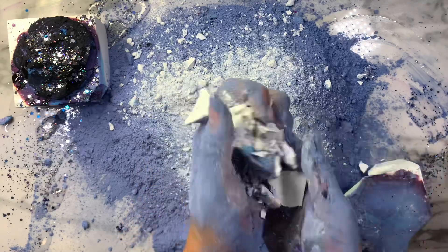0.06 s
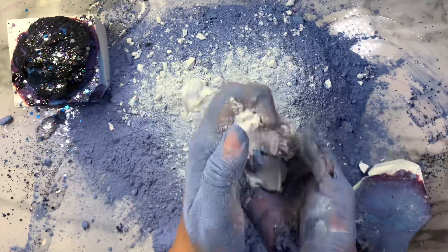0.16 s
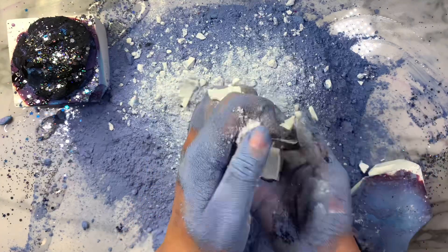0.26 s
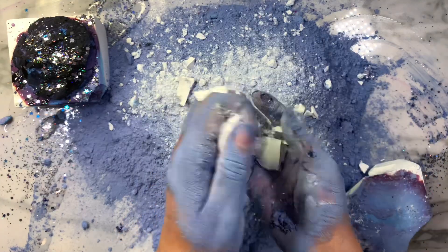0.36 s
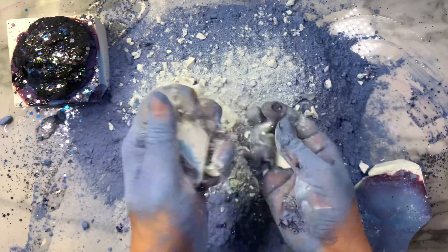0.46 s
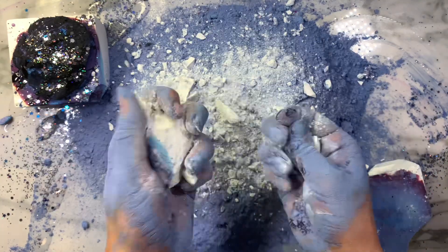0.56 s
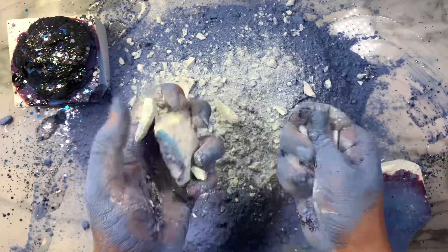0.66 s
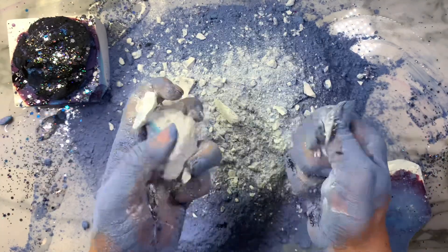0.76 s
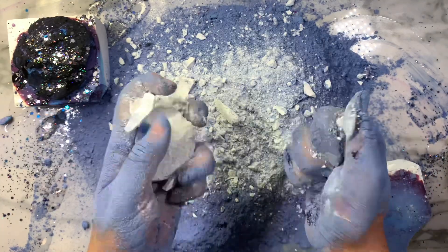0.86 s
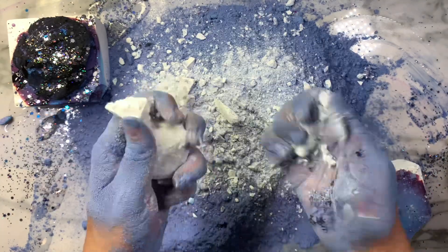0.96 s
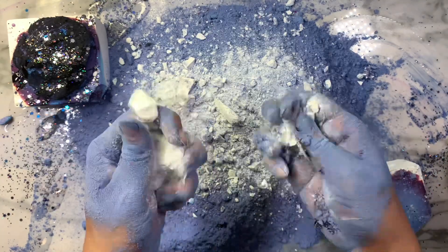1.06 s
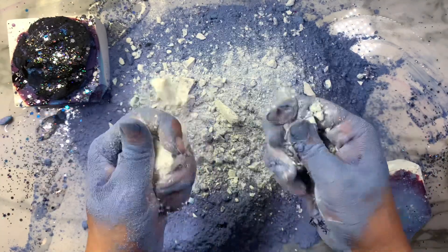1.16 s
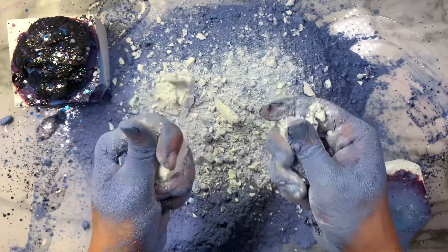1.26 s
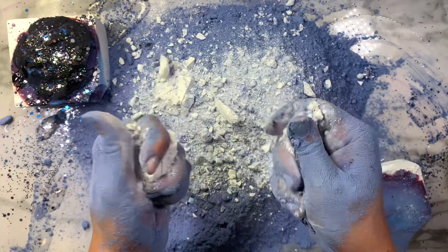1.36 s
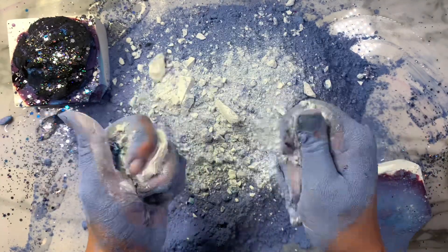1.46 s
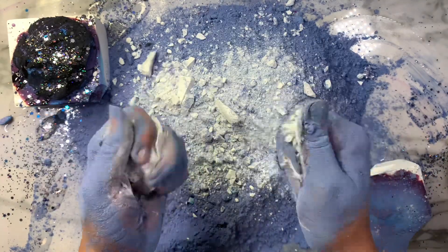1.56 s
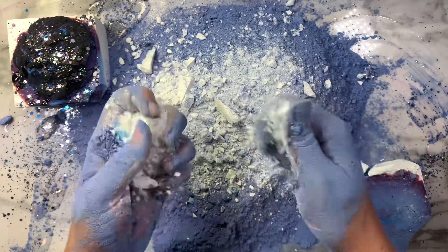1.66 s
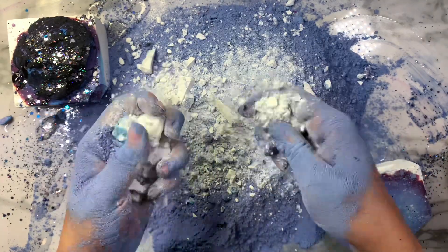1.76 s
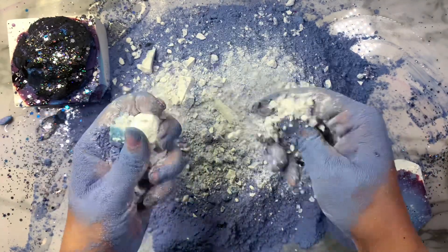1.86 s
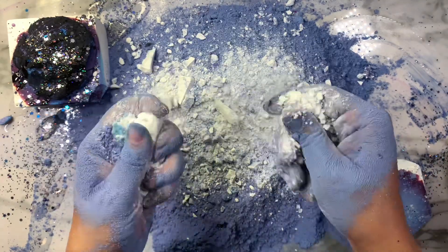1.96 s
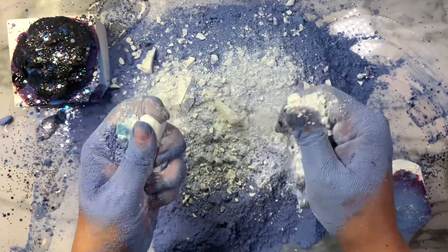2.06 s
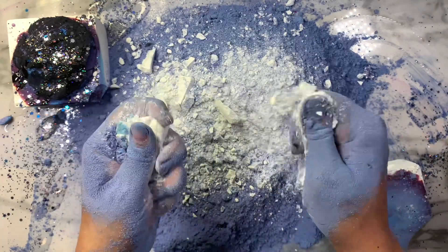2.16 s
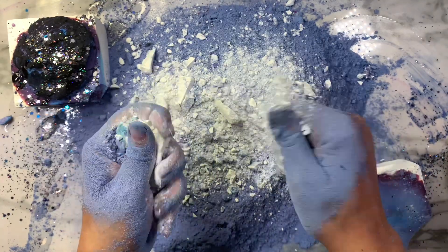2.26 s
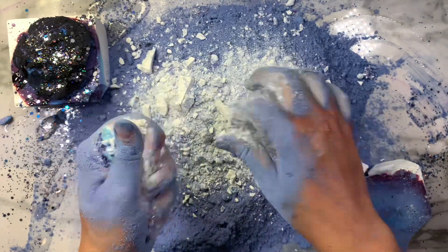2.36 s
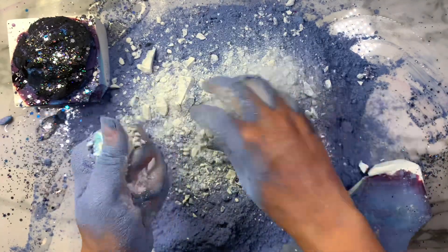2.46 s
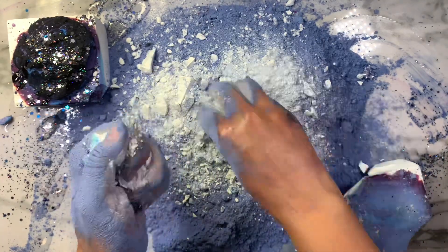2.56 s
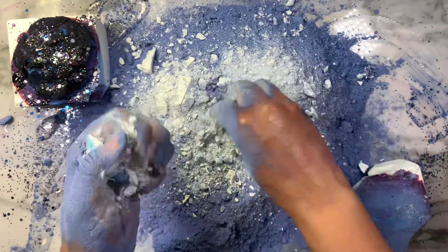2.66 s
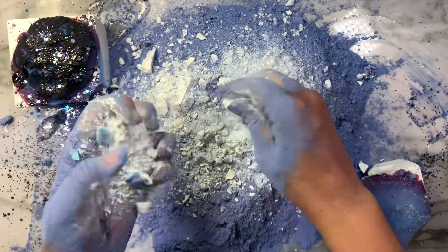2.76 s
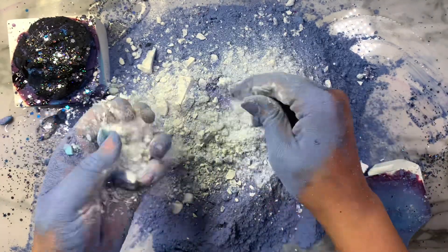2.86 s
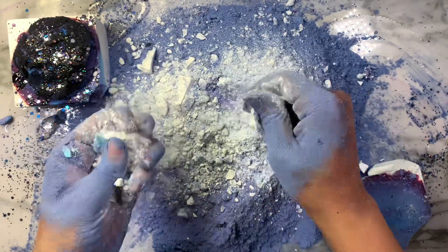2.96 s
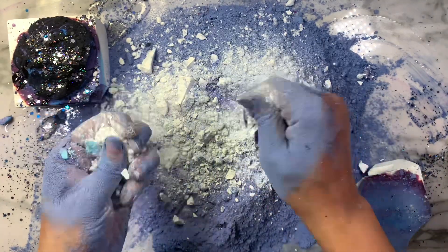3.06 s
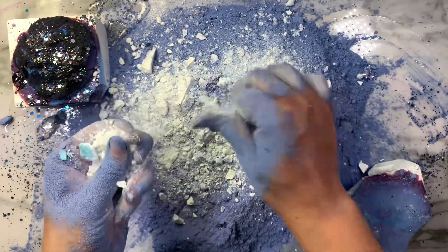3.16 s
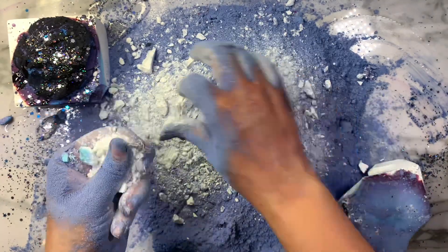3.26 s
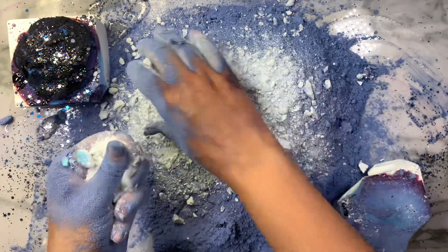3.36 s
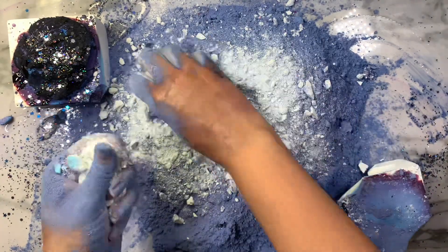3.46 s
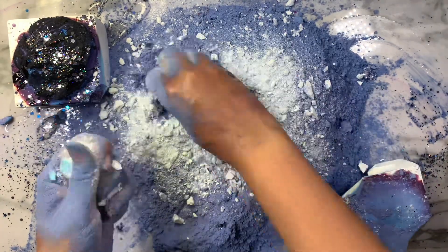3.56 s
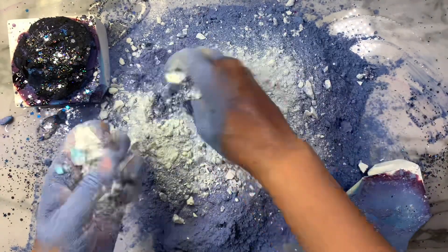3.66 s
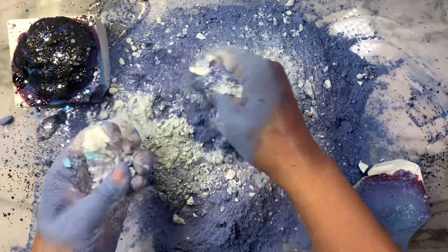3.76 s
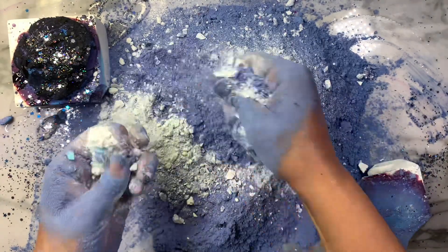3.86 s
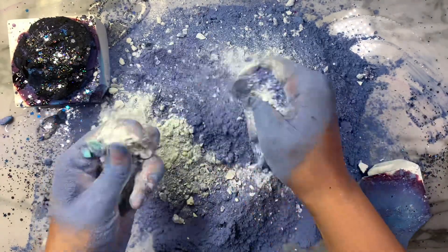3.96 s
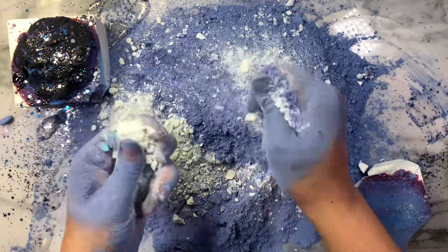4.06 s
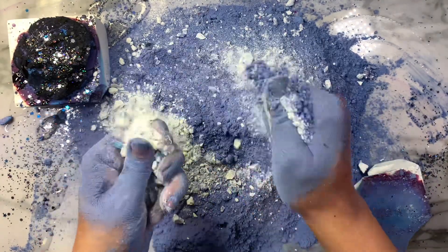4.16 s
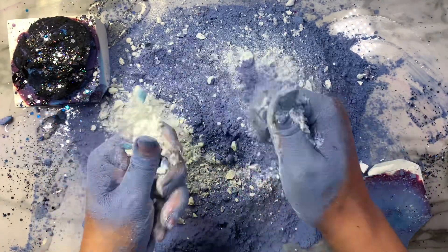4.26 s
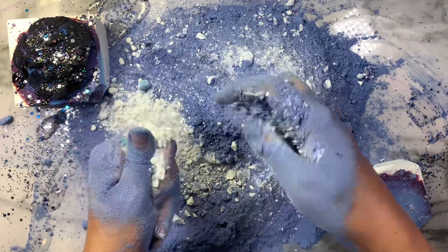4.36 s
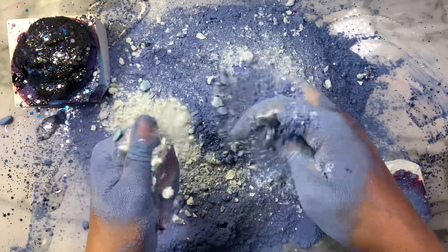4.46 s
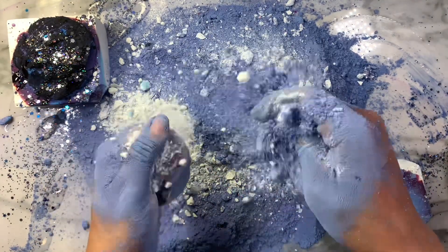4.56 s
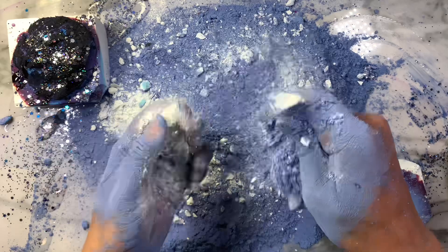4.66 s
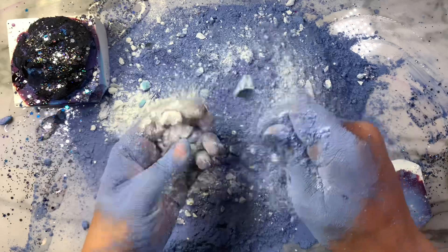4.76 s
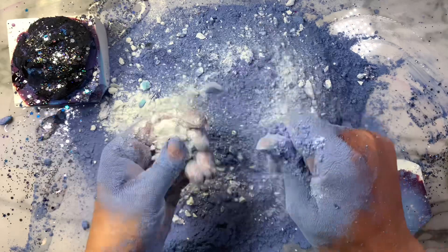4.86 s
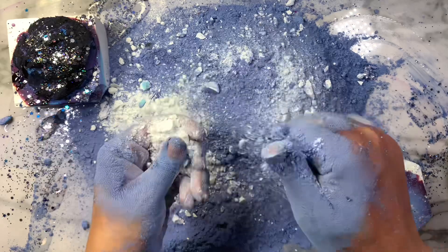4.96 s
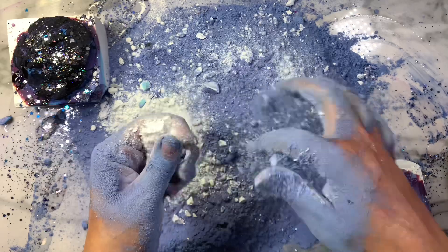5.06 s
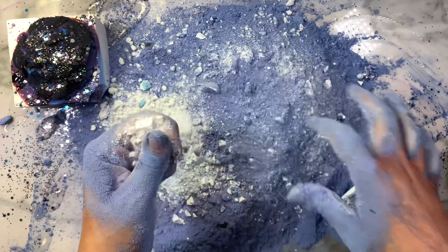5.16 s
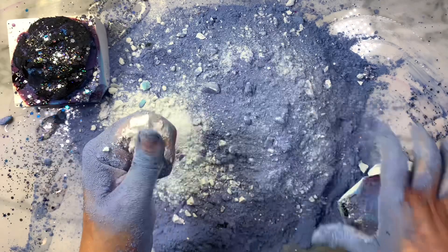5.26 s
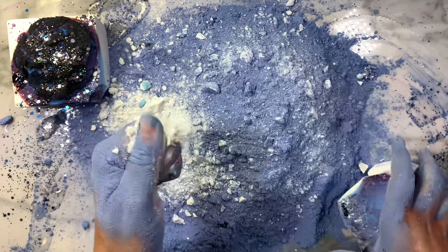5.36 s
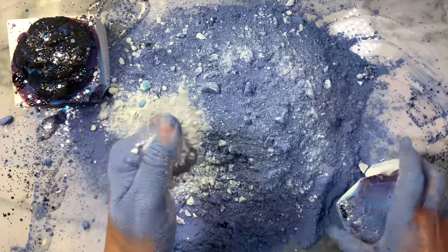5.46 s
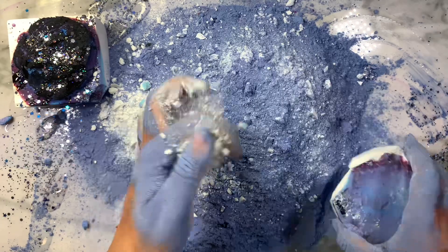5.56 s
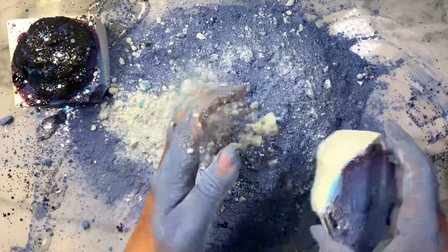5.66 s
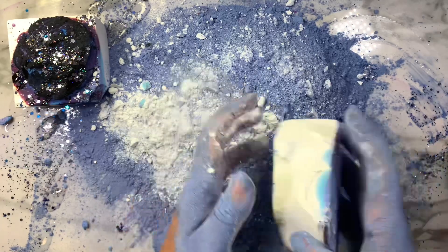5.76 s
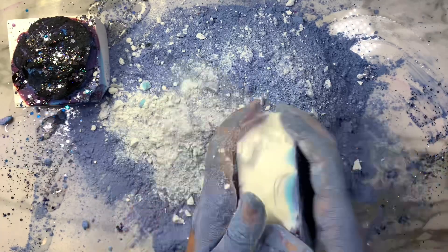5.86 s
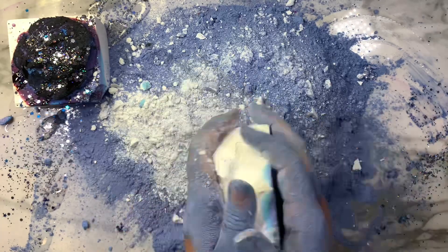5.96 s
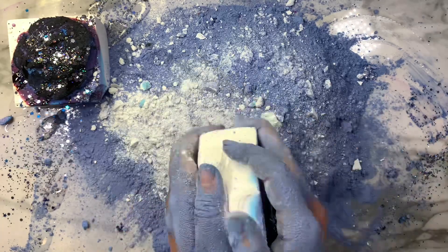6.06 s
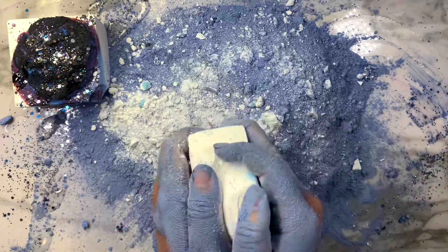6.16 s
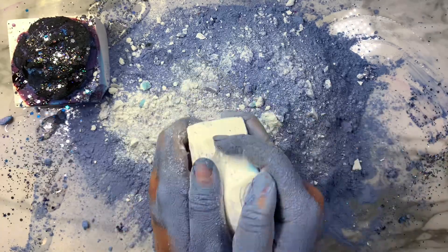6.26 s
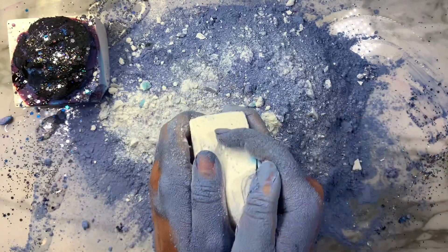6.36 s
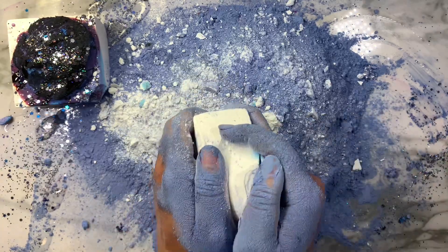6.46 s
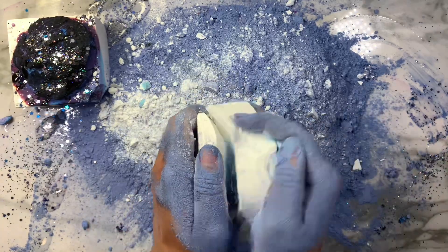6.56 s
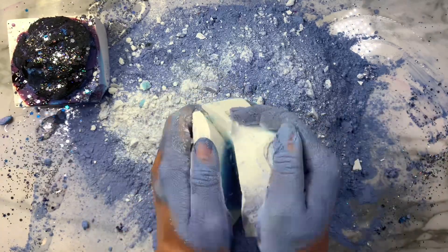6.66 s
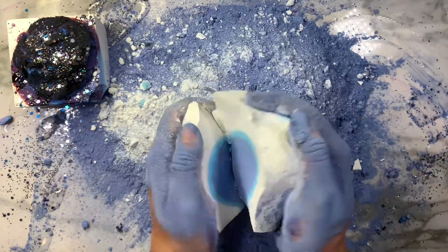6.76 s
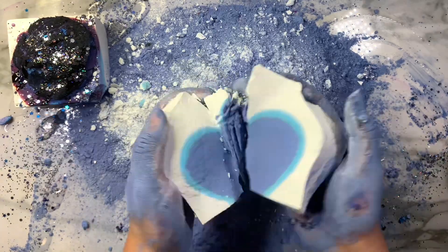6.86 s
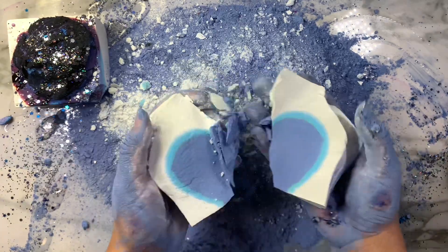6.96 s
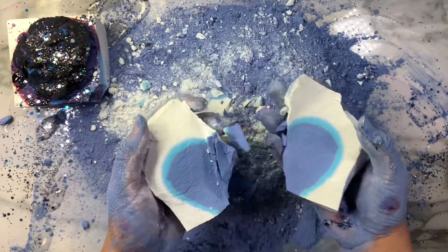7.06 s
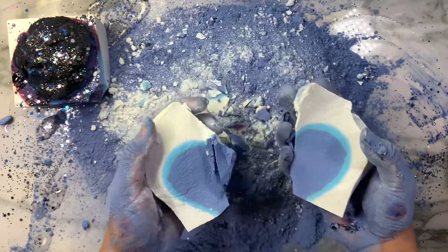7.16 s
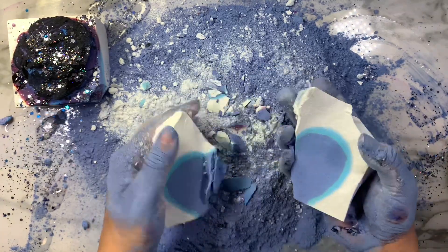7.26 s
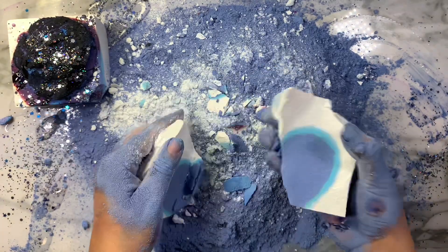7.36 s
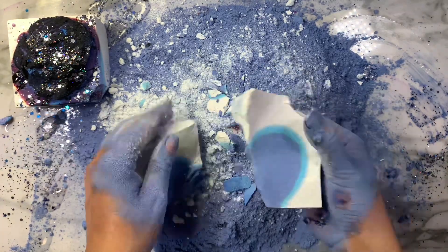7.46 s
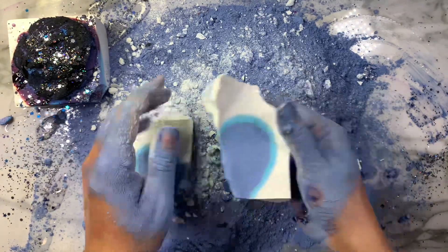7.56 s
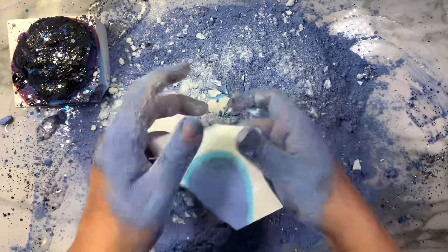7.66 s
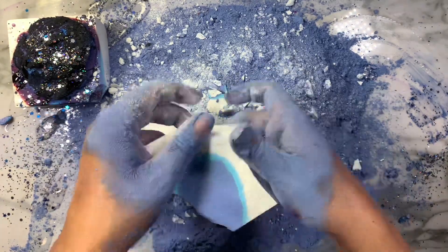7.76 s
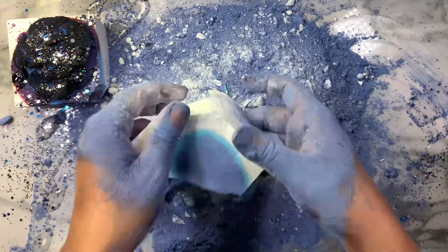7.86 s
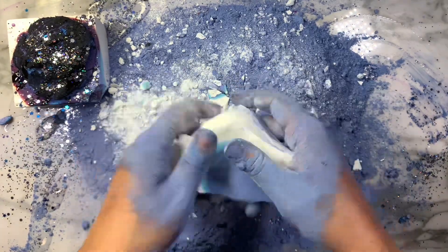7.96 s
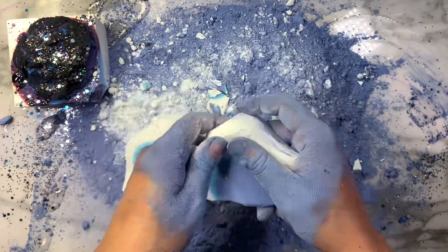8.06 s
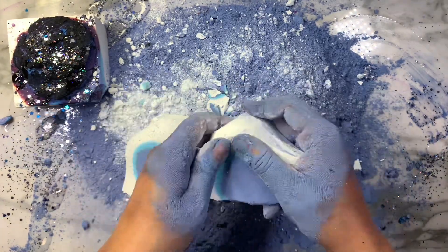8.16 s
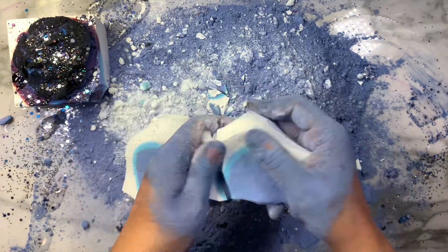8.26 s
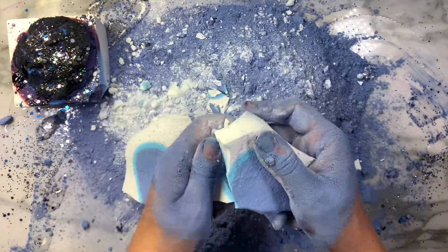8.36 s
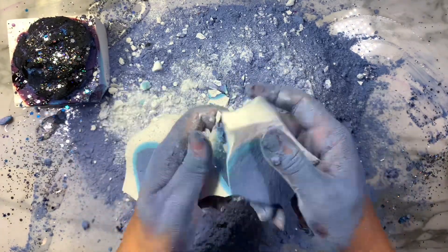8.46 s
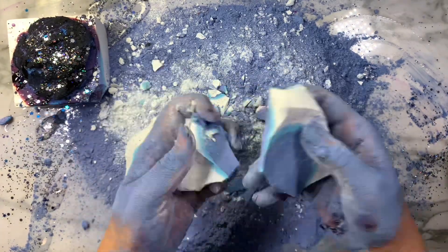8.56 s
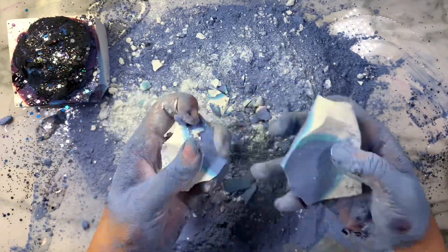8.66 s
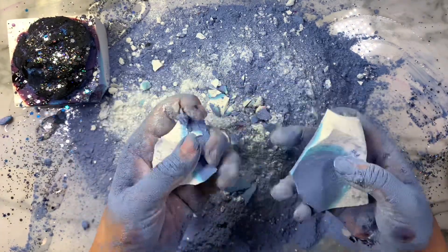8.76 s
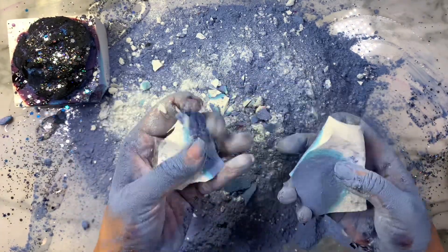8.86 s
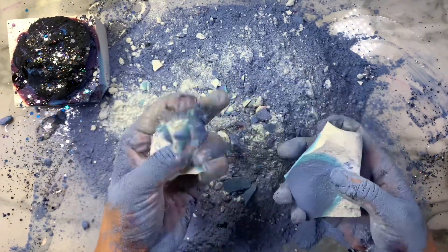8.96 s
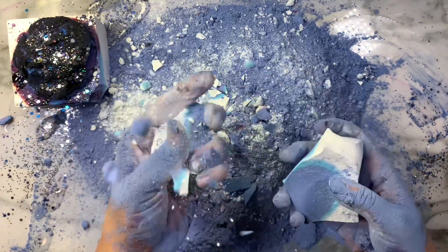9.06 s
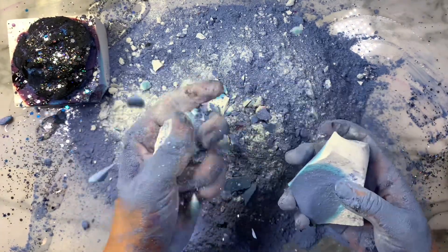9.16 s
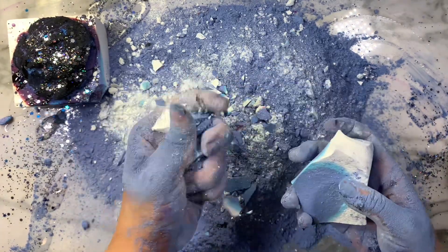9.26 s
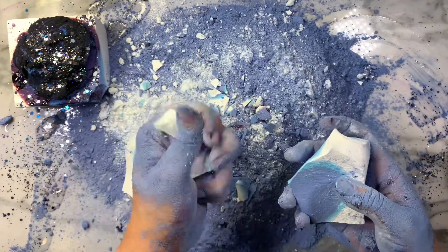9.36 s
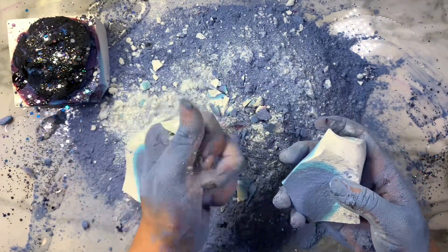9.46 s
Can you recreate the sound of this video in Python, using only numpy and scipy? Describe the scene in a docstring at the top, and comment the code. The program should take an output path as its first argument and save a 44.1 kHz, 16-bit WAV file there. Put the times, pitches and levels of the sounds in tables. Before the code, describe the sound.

Close, crisp chalk crushing: gritty crackles and powdery hiss, soft table thuds, skin rubbing on a block, loud brittle snaps, then a final crunch.

```python
"""Crushing dry chalk by hand

Two hands crush dry chalk over a table, close to a phone microphone: lumps crack, crumbs grind, powder hisses.
A fresh block is picked up, stroked, snapped and set down with a thud. The room hums low throughout.
Breaks, grinding and rubbing are shaped noise sent through resonances; thuds, pings and squeaks are sines."""
import sys
import numpy as np
from scipy import signal
from scipy.fft import rfft, irfft, next_fast_len
from scipy.io import wavfile
from scipy.ndimage import uniform_filter1d, map_coordinates

SR = 44100
rng = np.random.default_rng(int(sys.argv[2]) if len(sys.argv) > 2 else 0)


def log_audio(samples):
    """Write samples as a 16-bit WAV file to the path given in sys.argv[1]."""
    # one column per channel
    frames = np.atleast_2d(samples).T
    # limit to full scale, then quantise
    limited = np.clip(frames, -1, 1)
    pcm = np.round(limited * 32767).astype(np.int16)
    wavfile.write(sys.argv[1], SR, pcm)


def volts(x):
    """Linear amplitude factor 10**(x/20) for a level x in dB, scalar or array-like."""
    e = np.asarray(x, float) / 20
    return 10 ** e


N = 418950  # 9.5 s

# Resonances of chalk in cupped hands: (frequency [Hz], width [Hz], relative level [dB])
CUPPED_HANDS = [(1000, 83, -9), (1430, 183, 1.5), (1647, 174, -4.5), (2070, 228, 1.5), (2940, 749.5, -5),
                (3920, 350, -3)]
# Resonances of lumps against the palm: (frequency [Hz], width [Hz], relative level [dB])
PALM = [(275.4, 50, 2), (410, 53, 4), (760, 540, -4)]
# Spectrum of the treble spit and powder hiss: (frequency [Hz], relative level [dB])
FIZZ_SPECTRUM = [(1760, -33.5), (3000, -4), (4250, -2.5), (6080, 0), (7260, 2), (11600, -7), (14000, -9.5),
                 (15900, -15), (16500, -101)]
# Parts of the treble that single breaks favour: (frequency [Hz], relative level [dB])
FIZZ_PARTS = [(4500, -5.5), (7500, -4.5), (12500, -9)]
# Fists closing on crumbs, grind level against the powder hiss:
# (time of hardest grip [s], relative level [dB], rise [s], fall [s], grind level [dB])
GRIPS = [(0.052, -36, 0.05293, 0.055, -5.5), (.185, -36, 0.034, 0.051, -12), (.275, -46.5, 0.15, 0.31, -12),
         (0.416, -35, 0.069, 0.021, -9), (.495, -37.5, 0.08105, 0.0943, -6.5),
         (.569, -35.5, 0.049, 0.28, -1.5), (.673, -30, 0.051, 0.21, -4), (.813, -33, 0.064, 0.14, -7),
         (1.023, -37, 0.25, 0.26, -4.5), (1.102, -29.5, 0.096, 0.13, -5),
         (1.252, -26.5, 0.053, 0.051, -5.5), (1.357, -34.5, 0.15, 0.13, -3),
         (1.62, -39.5, 2.322, 0.1247, -3), (1.921, -39, 0.5, 0.64, -1), (2.145, -39, 0.17, 0.5526, -4.5),
         (2.3, -37.5, 0.24, 0.93, -6.5), (2.42, -38.5, 0.49, 0.12, -3), (2.62, -38.5, 0.298, .3, -12),
         (2.72, -48, .2, 0.04, -6), (2.888, -34, 0.016, 0.42, -10), (2.973, -41.5, 0.11, 0.47, 0),
         (3.151, -34, 0.10214, 0.0482, -8), (3.265, -45.5, 0.16, 0.11, 2), (3.357, -37, 0.037, 0.12, 0.5),
         (3.457, -42, 0.0425, 0.097, -9), (3.54, -45.5, 0.65, 0.043, -1.5), (3.658, -47, 0.22, 0.086, 0.5),
         (3.776, -41.5, 0.026, 0.11, 2.5), (3.961, -37, 0.18, 0.17, -1), (4.101, -33, 0.062, 0.046, -0.5),
         (4.28, -34.5, 0.22, 0.21, -3), (4.47, -43.5, 0.87, 0.36, 1), (4.64, -40.5, 0.088, 0.058, -1),
         (4.93, -39.5, 0.37, 0.45, -0.5), (5.153, -38, 0.39, 0.041, 2), (5.385, -39, 0.065, 0.027, -1),
         (9.11, -33, 0.032, 0.11, -3.5), (9.24, -38.5, 0.023, 0.22, 4.5), (9.325, -32, 0.0487, 0.77, -5),
         (9.41, -38, 0.11, 0.15, 5.5), (9.49, -30, 0.089, 0.1001, -8.5)]


def cracks():
    """Each fracture knocks the palm, rings the cupped chalk and spits treble."""
    # The clear fractures: (time [s], relative body level [dB], body pitch [Hz],
    # relative fizz level [dB], relative knock level [dB])
    fractures = [(0.2415,-22,1270,-30.5,-38.5),(0.2663,-27,1831,-25,-35.5),(0.521,-23,2127,-27,-38),(0.5296,-22.5,1599,-31,-57.5),
                 (0.541,-40,3000,-30,-62),(0.554,-10.5,1545,-28.5,-34),(0.5722,-21,3003,-20.5,-38),(0.5911,-16.5,2460,-24,-43),(0.6125,-24,3036,-30.5,-47.5),
                 (0.6625,-8.5,1435,-11,-22),(0.6649,-31,2350,-5,-48.5),(.6766,-20,2577,-25.5,-46),(0.6952,-40.5,3000,-31,-58.5),(.719,-20,1500,-21,-45),
                 (.739,-26,1689,-31,-59),(0.763,-32,2753,-20,-38),(0.8001,-20.5,1500,-21,-47),(0.804,-18,2482,-13,-40),(0.8165,-33,1500,-36,-47),
                 (0.8606,-28.5,3123,-43.5,-60),(0.9092,-40,3600,-21.5,-43),(0.962,-28.5,2039,-32,-40),(0.985,-31,2134,-17.5,-43),
                 (1.0191,-14,2191,-27,-34.5),(1.0914,-15,3101,-23,-32),(1.095,-15,2124,-22,-39),(1.1092,-18.5,2994,-15,-40),
                 (1.138,-38,2252,-24.5,-59),(1.1915,-18,1894,-30,-48),(1.2042,-16,2053,-22.5,-36),(1.2394,-13.5,1701,-20,-21),
                 (1.259,-25,2057,-28,-44),(1.343,-23,2060,-39,-35.5),(1.3657,-22.5,3029,-24,-40),(1.4388,-28,2401,-24.5,-43.5),
                 (1.4773,-52.5,2670,-38,-37),(1.6093,-45,2500,-28.5,-64.5),(1.7784,-30,2293,-28,-41),(1.794,-34,2500,-34,-52),(1.8008,-29,1800,-32,-44.5),(1.8325,-38,3130,-38,-43),(1.873,-29,1998,-56,-43),(1.928,-29.5,2004,-19,-37),(1.961,-34,1500,-37.5,-37),(1.989,-25,2186,-20.5,-37),
                 (2.143,-20.5,2501,-20,-44),(2.1753,-22.5,2918,-26,-40),(2.2063,-16.5,2635,-46,-44),(2.2913,-20.5,3451,-28,-54.5),
                 (2.3,-25,2050,-15.5,-38.5),(2.321,-32,3004,-28,-42),(2.3392,-25,1918,-27.5,-45),(2.356,-28,3080,-26.5,-47),(2.367,-34.5,2997,-31,-44),(2.3729,-25,2550,-32,-45),
                 (2.433,-37.5,2500,-44,-45),(2.705,-35,2012,-27,-73.5),(2.872,-22.5,2674,-17.5,-34),(2.906,-48,2250,-25,-44.5),(2.9284,-46,2290,-32,-37),
                 (2.9652,-21,2353,-20,-41),(2.9756,-41,2210,-26.5,-44),(3.073,-32.5,2194,-25,-59),(3.247,-30,2506,-29.5,-41),
                 (3.263,-39,3150,-31,-47),(3.3049,-35,1131,-35,-36.5),(3.3535,-34,1502,-36,-38.5),(3.7325,-35,1281,-32,-35.5),(3.768,-13,2358,-28,-25.5),(3.8476,-29,2578,-28.5,-40),
                 (3.933,-41,2600,-35,-59),(3.945,-26.5,3644,-25.5,-32.5),(4.0932,-13.5,2070,-29,-32),(4.128,-24.5,2342,-30,-41),(4.266,-14,2746,-27,-37),
                 (4.2766,-24,1960,-28,-42),(4.293,-40,2320,-27,-50.5),(4.3052,-26,2140,-18.5,-38),(4.3488,-18.5,2023,-22,-34),
                 (4.4616,-32,2856,-29,-48),(4.491,-34,2667,-29.5,-45),(4.5138,-38.5,1639,-40.5,-43),(4.527,-35,1000,-52,-42.5),(4.5567,-34,1250,-52,-44),(4.631,-30,1100,-34,-37.5),(4.768,-22.5,2404,-35,-41),(4.842,-41,1100,-49,-48),
                 (4.8702,-38,1540,-35,-33),(4.931,-19.5,2209,-24,-38),(5.0217,-18.5,2860,-17,-46),(5.0565,-27,1991,-54.5,-67.5),
                 (5.0862,-29,2204,-31,-41),(5.118,-26.5,1636,-44,-34.5),(5.1641,-25,2369,-25,-38),(5.259,-32,2693,-23.5,-38.5),
                 (5.3776,-32,2164,-36.5,-67),(5.5436,-31,2071,-36,-41),(5.5972,-25.5,1936,-51.5,-38.5),(5.608,-32,1896,-29.5,-50),
                 (5.638,-30,2380,-35.5,-47.5),(5.682,-30.5,3212,-35,-38),(5.768,-72,2590,-43.5,-71.5),(6.329,-23.5,1430,-29.5,-34),(6.5172,-19,1760,-22,-36),
                 (6.5213,-15,2252,-13,-53),(6.5375,-49,2370,-40,-43),(6.5498,-5,1900,-17.5,-22),(6.558,-3,1800,-15.5,-38),
                 (6.5693,-7,1980,-14,-26),(6.5707,-2,3800,-2.5,-36),(6.5967,-29,1727,-24,-53),(6.655,-18,3411,-14.5,-47.5),
                 (6.6723,-27,2611,-48,-68.5),(6.9653,-30.5,2082,-49.5,-67.5),(7.011,-49.5,3270,-35,-50.5),(7.0244,-60,3060,-31,-64),(7.04,-17,3243,-34,-43.5),
                 (7.0576,-26,3078,-21,-44),(7.1596,-34,1590,-38,-39),(7.1684,-34,2789,-76,-56),(7.585,-18.5,2743,-20,-50),
                 (7.728,-34,2876,-45.5,-45),(7.767,-33,2145,-35,-48),(7.7788,-34,1812,-40,-57),(7.999,-35,1295,-50,-44),(8.073,-37,2954,-35,-63),
                 (8.2637,-16,2800,-32,-46),(8.268,-11,3000,-15,-41),(8.271,-6,2900,1,-13),(8.2866,-7.5,2500,-12,-27.5),
                 (8.2891,-5,2940,-16,-42),(8.2934,-9.5,2968,-10.5,-29),(8.3051,-40,2090,-14,-34),(8.6776,-32,3196,-25,-54),
                 (8.689,-34,3079,-31,-68),(8.778,-39,2300,-32,-65),(8.8588,-28,2975,-29,-46),(8.8624,-30.5,2530,-21.5,-49),(8.925,-28,2627,-21.5,-63.5),(8.9438,-31,1928,-24,-35),
                 (8.9614,-35,3900,-19,-62),(9.0849,-12.5,1881,-19.5,-36),(9.1005,-37.5,2900,-29,-45),(9.1134,-13,2883,-11,-22),(9.153,-30,2317,-32,-49),
                 (9.2067,-24,3350,-25,-37),(9.223,2,1450,-17,-10.5),(9.2258,-5,2200,-14,-51),(9.273,-37,2520,-23,-50),
                 (9.29,-21,2041,-34,-48),(9.324,-26,3190,-25,-57),(9.339,-40.5,1450,-24.5,-42),(9.352,-25,3000,-9,-52),
                 (9.3724,-23.5,1884,-19,-28.5),(9.3791,-27,2820,-22,-53),(9.397,-4,2157,-13,-35),(9.4077,-45.5,2250,-16,-47.5),
                 (9.443,-17,2607,-15.5,-48),(9.4663,0,1971,-2.5,-16.5)]
    s, body_db, body_hz, fizz_db, knock_db = np.vstack([fractures, small_cracks()]).T

    knocks = bursts(len(s), click_s=0.0055, tail_s=0.15, tail_db=-14, spike_db=14, uneven_db=1.5, size=30)
    out = filtered(placed(s, knock_db, knocks), modes(PALM))

    spits = bursts(len(s), click_s=0.0007308, tail_s=0.02777, tail_db=-15, spike_db=3, uneven_db=2, size=1)
    favour_db = 3.5 * rng.standard_normal((len(s), len(FIZZ_PARTS)))  # each break has its own treble balance
    for (hz, part_db), db in zip(FIZZ_PARTS, favour_db.T):
        out += filtered(placed(s, fizz_db + db + part_db, spits), fizz_part(hz, 0.6 * hz))

    splits = bursts(len(s), click_s=0.003672, tail_s=0.1, tail_db=-18, spike_db=14, uneven_db=1.5, size=8)
    # The split heard straight, then its ring in the hands
    out += filtered(placed(s, body_db - 10.5, splits), dull_mode(2200, 3500))
    for k, (hz, width, db) in enumerate(CUPPED_HANDS):
        near_db = -12 * abs(np.log2(hz / body_hz))  # a lump drives most the hollows near its own pitch
        ring = filtered(placed(s, body_db + db + near_db - 8, splits), dull_mode(hz, width))
        out += (-1) ** k * ring
    return out


def small_cracks():
    """Lesser breaks at chance moments, as strong as the squeeze allows; columns as for the clear fractures."""
    per_s, over_grip_db, spread_db = 34, -5.5, 4
    pitch_hz, pitch_octaves = 2470, 0.78  # middle pitch and its scatter
    tilt_db, knock_db = 6, -16.5  # some are all body, some all fizz
    when = rng.random(400)
    size, bright, pitch = rng.standard_normal((400, 3)).T
    s = np.cumsum(-np.log(1 - when)) / per_s
    grip_db = gestures(*np.transpose(GRIPS)[:-1])[np.minimum(s * SR, N - 1).astype(int)]
    db = grip_db + over_grip_db + spread_db * size.clip(-3, 1)
    hz = pitch_hz * 2 ** (pitch_octaves * pitch)
    rows = [s, db - tilt_db * bright, hz, db + tilt_db * bright, db + knock_db]
    return np.transpose(rows)[s < N / SR]


def kneading():
    """Crumbling feeds both the treble hiss and the hollow of the hands; bigger crumbs knock, single grains tick."""
    s, hiss_db, rise, fall, grind_db = np.transpose(GRIPS)
    hiss = volts(gestures(s, hiss_db, rise, fall))
    grind = volts(gestures(s, hiss_db + grind_db, rise, fall))
    grain_db = -7  # single grains and pebbles against the continuous crumbling

    shared = ticks(per_second=220, spread_db=2.5)  # heard in hiss and hollow alike
    crumbs = unit(grit(per_second=54, spread_db=-2, life_s=0.00062, clump_db=4.5) + 0.31 * shared)
    grains = sum(volts(db) * filtered(ticks(per_second=45, spread_db=4.5), fizz_part(hz, 0.7 * hz))
                 for hz, db in FIZZ_PARTS)
    powder = filtered(crumbs, colour(FIZZ_SPECTRUM)) + volts(grain_db) * unit(grains)

    lumps = grit(per_second=120, spread_db=3, life_s=0.0024, clump_db=2)
    lumps = unit(lumps + 0.4 * crumbs + 0.5 * shared)
    pebbles = sum(volts(db) * filtered(ticks(per_second=14, spread_db=4.5), modes([(hz, width, 0)]))
                  for hz, width, db in CUPPED_HANDS)
    hollow = filtered(lumps, modes(CUPPED_HANDS))
    hollow += volts(-6.5) * filtered(lumps, modes(PALM)) + volts(grain_db) * unit(pebbles)
    return volts(-11.5) * hiss * powder + volts(-9) * grind * hollow


def strokes():
    """Skin dragging on the chalk swishes and scrapes; firm slides make its modes sing and fingertips squeak."""
    # Swishes and scrapes of hands on the block, then its halves, with crumbling after the snaps;
    # grind level against the swish:
    # (time of firmest contact [s], relative level [dB], rise [s], fall [s], grind level [dB])
    slides = [(5.508, -37, 0.06193, 0.049, -6), (5.672, -47.5, 0.13, 0.041, 1),
              (5.882, -34, 0.068, 0.061, -38.5), (6.001, -41.5, 0.04406, 0.0884, -9.5),
              (6.15, -43.5, 0.31, 0.045, -5.5), (6.22, -56.5, 0.1035, 0.25, -20.5),
              (6.345, -56, 0.01203, 0.12, -12), (6.52, -25, 0.00518, 0.0737, -8),
              (6.568, -33, 0.023, 0.068, 0), (6.7, -48, 0.0467, 0.33, 1.5), (6.82, -45, 0.073, 0.058, -0.5),
              (6.959, -44, 0.15, 0.076, -7.5), (7.054, -41.5, 0.053, 0.087, -1.5),
              (7.174, -45.5, 0.041, 0.072, -7.5), (7.451, -33, 0.14, 0.034, -6),
              (7.545, -36.5, 0.088, 0.083, -6.5), (7.682, -45, 0.082, 0.45, -3),
              (7.96, -34.5, 0.12, 0.078, -10.5), (8.058, -41.5, 0.37, 0.015, -6),
              (8.27, -25.5, 0.0075, 0.057, 0.5), (8.496, -39, 0.05, 0.12, -7),
              (8.645, -38, 0.1548, 0.0296, -13), (8.77, -42.5, 0.16, 0.02172, -12),
              (8.954, -40, 0.14, 0.15, -9)]
    # Firm slides that wake the modes, against the swish: (start [s], end [s], relative level [dB])
    rubs = [(5.78, 5.97, -.5), (7.28, 7.62, 2), (7.64, 7.8, 0), (7.85, 8.07, -8)]
    # Spectrum of the skin swish: (frequency [Hz], relative level [dB])
    swish = [(1800, -38), (3000, -9.5), (4200, -6), (8250, 0), (12000, -7), (15700, -10.5), (16500, -56)]
    # Hollow between hands and chalk: (frequency [Hz], width [Hz], relative level [dB])
    hand_hollow = [(1540, 1350, 3.5), (2050, 280, 11), (2530, 580, 1), (3160, 230, 7.5), (3900, 1454, 1)]
    # Modes of the chalk block: (frequency [Hz], width [Hz], relative level [dB])
    block = [(2300, 45, 2), (2670, 50, 1), (4040, 80, 10), (4730, 90, 7), (5720, 120, 6), (6510, 160, 6),
             (7530, 120, 5), (8060, 100, 6)]
    # Modes of the broken half: (frequency [Hz], width [Hz], relative level [dB])
    half = [(2620, 60, 6), (3050, 70, 4), (4110, 180, 6), (5390, 110, 6), (7080, 110, 7), (7660, 70, 4),
            (9500, 110, 1), (10600, 100, -3)]
    # A fingertip drags and whistles in one band:
    # (start [s], end [s], frequency [Hz], width [Hz], relative level [dB])
    squeaks = [(5.491, 5.553, 4600, 89.94, -50), (5.495, 5.556, 5970, 70, -51.5),
               (6.025, 6.178, 1600, 150.7, -54.5), (6.893, 6.967, 3900, 150, -56),
               (7.313, 7.36, 8330, 299.9, -45), (7.722, 7.843, 2640, 120, -56.5),
               (7.906, 7.962, 4900, 150, -53.5), (7.938, 7.989, 5900, 500, -47),
               (8.46, 8.556, 5240, 502.6, -47), (8.469, 8.554, 8700, 601.4, -45),
               (8.556, 8.61, 7770, 500, -47), (8.604, 8.663, 9360, 600.3, -43),
               (8.704, 8.766, 7757, 499, -48), (8.746, 8.79, 9275, 400, -54)]
    snap_s = 6.57  # from here on the hands hold the halves

    s, swish_db, rise, fall, grind_db = np.transpose(slides)
    drag = volts(1.3 * wobble(60))
    skin = filtered(streaky(depth_db=1.8), colour(swish))
    rub = streaky(depth_db=2.5)
    whole = np.arange(N) < snap_s * SR
    sing = spans(rubs) * np.where(whole, filtered(rub, modes(block)), filtered(rub, modes(half)))
    grind = filtered(streaky(depth_db=1.5), modes(hand_hollow))
    out = volts(gestures(s, swish_db, rise, fall) - 6) * drag * (skin + sing)
    out += volts(gestures(s, swish_db + grind_db, rise, fall) - 4.5) * drag * grind

    for start, end, hz, width, db in squeaks:
        t = np.arange(round((end - start) * SR)) / SR
        # The phase wanders: a fuzzy tone
        sway = np.cumsum(rng.standard_normal(len(t))) * np.sqrt(2 * np.pi * width / SR)
        swell = np.sin(np.pi * t / (end - start)) ** 0.31 * volts(4 * wobble(68, size=len(t)))
        out[round(start * SR):][:len(t)] += volts(db) * swell * np.sin(2 * np.pi * hz * t + sway)
    return out


def sweeps():
    """Powder pushed over the table rasps low."""
    # A hand ploughs the pile: (start [s], end [s], relative level [dB])
    pushes = [(2.502, 2.706, -56), (3.433, 3.47, -43), (3.46, 3.572, -49.5)]
    rasp = grit(per_second=530, spread_db=2, life_s=0.000873, clump_db=1.5)
    low = modes([(380.6, 150, 1.5), (1093, 1400, -5)])
    return spans(pushes) * filtered(rasp, lambda f: low(f) / (1 + 1j * f / 2500) ** 2)


def pings():
    """A few short rings, each one decaying sine of uneven level, from 1.5 to 8 kHz."""
    # Short rings: (time [s], frequency [Hz], relative level [dB], 60 dB decay [s])
    rings = [(1.795, 6439, -33.5, 0.02967), (6.33, 1520, -25, 0.019), (6.436, 1538, -46, 0.0248),
             (7.059, 6180, -15, 0.021), (8.961, 8100, -15.5, 0.037)]
    out, t = np.zeros(N + SR), np.arange(SR // 10) / SR
    for s, hz, db, t60 in rings:
        level = volts(db - 60 * t / t60 + 2.8 * wobble(240, size=len(t)))
        out[round(s * SR):][:len(t)] += level * np.sin(2 * np.pi * hz * t)
    return out[:N]


def thuds():
    """Soft contacts swing the table top slowly; firmer ones start fast and wake its upper modes."""
    # Soft blows on the table: (time [s], relative level [dB], relative slap level [dB])
    blows = [(0.04, -34, -20), (1.267, -38, -23), (1.929, -38, -5.5), (3.462, -32, -23), (3.518, -35, -19),
             (3.575, -38.5, -22), (5.477, -26, -28), (5.519, -32.5, -34), (6.521, -34, -0.5),
             (6.569, -47.5, 11), (7.446, -22.5, -2.5), (7.718, -36, -19), (7.987, -40, -14),
             (8.268, -33.5, -5), (8.944, -38, -12.5), (9.221, -37, -2), (9.465, -32.5, -3.5)]
    # Modes of the table top: (frequency [Hz], relative level [dB], 60 dB decay [s])
    table_top = [(58, 8.5, 0.13), (80, 2, 0.15), (151.7, 5, 0.072), (180, 0, 0.088), (286, -0.5, 0.082)]
    out, t = np.zeros(N + SR), np.arange(SR // 2) / SR
    for s, db, slap_db in blows:
        firm = 0.96 * volts(0.1652 * slap_db)
        ring = np.zeros(len(t))
        for hz, level, t60 in table_top:
            upper_db = slap_db + 6 if hz > 110 else 0
            onset = 1 - np.exp(-t * hz * firm)
            ring += volts(level + upper_db - 60 * t / t60) * np.sin(2 * np.pi * hz * t) * onset
        out[round(s * SR):][:len(t)] -= volts(db + 3) * ring
    return out[:N]


def room():
    """Low rumble with a few wavering fuzzy lines, over a faint hiss: all filtered noise."""
    # Spectrum of rumble and hiss: (frequency [Hz], relative level [dB])
    hum = [(12, -44), (20, 11), (81, -4.5), (164, -3.5), (341, -17), (492, -21), (771, -26), (1600, -31.5),
           (3320, -33), (8880, -34.5), (15100, -35), (16500, -61)]
    # Distant machinery, each resonance applied twice: (frequency [Hz], width [Hz], relative level [dB])
    machinery = [(76.9, 21, -52.5), (124.5, 17, -58), (171.4, 25, -60), (478.5, 46, -70.5)]
    # A dull band near 500 Hz swells for a moment: (start [s], end [s], relative level [dB])
    murmur = [(6.02, 6.53, -60)]
    air = volts(-51 + 0.97 * wobble(1.313)) * filtered(rng.standard_normal(N), colour(hum))
    lines = sum(volts(db + 3.7 * wobble(1.29)) * fuzzy_line(hz, width) for hz, width, db in machinery)
    return air + lines + spans(murmur) * fuzzy_line(500, 170)


def fuzzy_line(hz, width):
    """Noise through the same resonance twice."""
    return filtered(rng.standard_normal(N), lambda f: modes([(hz, width, 0)])(f) ** 2)


def fizz_part(hz, width):
    """Response of one part of the treble: the fizz spectrum through a broad resonance."""
    return lambda f: colour(FIZZ_SPECTRUM)(f) * modes([(hz, width, 0)])(f)


def dull_mode(hz, width):
    """Response of a resonance in a lump, which is dull above 9 kHz."""
    return lambda f: modes([(hz, width, 0)])(f) / (1 + 1j * f / 9000) ** 2


def bursts(count, click_s, tail_s, tail_db, spike_db, uneven_db, size):
    """One row per break: a spike, a sharp split and a crumbling tail of noise (times to fall 60 dB)."""
    t = np.arange(SR // 10) / SR
    spread = volts(uneven_db * rng.standard_normal((count, 2)))  # no two breaks last alike
    split = volts(-60 * t / (click_s * spread[:, :1]))
    tail = volts(tail_db - 60 * t / (tail_s * spread[:, 1:]))
    noise = rng.standard_normal((count, len(t)))
    rows = (split + tail) * np.sign(noise) * abs(noise) ** 0.33
    rows[:, 0] = -volts(spike_db)
    rows[:, 1:4] *= volts(spike_db / 3)  # the uneven first instants colour each spike
    heard = uniform_filter1d(rows, size=size)  # by a body of this dullness, in samples
    energy = np.linalg.norm(heard, axis=1, keepdims=True)
    return rows * np.median(energy) / energy  # long or short, each break spends the same energy


def placed(s, db, rows):
    """The rows summed at their moments and levels."""
    at = np.round(s * SR).astype(int)[:, None] + np.arange(rows.shape[1])
    return np.bincount(at.ravel(), (volts(db)[:, None] * rows).ravel(), N + SR)[:N]


def grit(per_second, spread_db, life_s, clump_db):
    """Noise of rms 1 that jumps up at tiny uneven breaks and dies back, its level drifting in clumps."""
    size = volts(spread_db * rng.exponential(1, N).clip(0, 5)) * (rng.random(N) < per_second / SR)
    swell = signal.lfilter([1], [1, -np.exp(-1 / (life_s * SR))], size)
    return unit((1 + swell) * volts(clump_db * wobble(35)) * rng.standard_normal(N))


def ticks(per_second, spread_db):
    """Single tiny snaps of very uneven size; each lasts a few samples and so has its own colour."""
    size = volts(spread_db * rng.exponential(1, N).clip(0, 4)) * (rng.random(N) < per_second / SR)
    return unit(np.convolve(size, np.ones(6), "same") * rng.standard_normal(N))


def streaky(depth_db):
    """Noise in which narrow bands swell for some hundredths of a second."""
    z = signal.stft(rng.standard_normal(N), nperseg=256)[2]
    field = uniform_filter1d(rng.standard_normal(z.shape), size=2, axis=0)  # over frequency
    field = uniform_filter1d(field, size=24, axis=1)  # over time
    return unit(signal.istft(z * volts(depth_db * unit(field)), nperseg=256)[1][:N])


def gestures(s, db, rise, fall):
    """Level in dB: each gesture climbs to its peak and dies away; the strongest one rules."""
    swing_db = 15  # gained over the rise time, lost over the fall time
    coarse = np.arange(0, N, 32)
    late = coarse / SR - s[:, None]
    level = db[:, None] - swing_db * np.maximum(late / abs(fall[:, None]), -late / abs(rise[:, None]))
    return np.interp(np.arange(N), coarse, level.max(axis=0))


def spans(rows):
    """Gain that swells over each (start, end, dB) span."""
    t = np.arange(N) / SR
    return sum(volts(db) * np.sin(np.pi * np.clip((t - start) / (end - start), 0, 1)) ** 0.5
               for start, end, db in rows)


def wobble(rate, size=N):
    """A smooth random curve, rate knots a second."""
    return map_coordinates(rng.standard_normal(int(size * rate / SR) + 4), [np.arange(size) * rate / SR])


def unit(x):
    """Scaled to rms 1."""
    return x / np.sqrt(np.mean(x ** 2) + 1e-20)


def filtered(x, response):
    """x times a complex response of frequency, scaled so that a unit click keeps its energy."""
    m = next_fast_len(N + 8192)
    gain = response(np.fft.rfftfreq(m, 1 / SR))
    return irfft(rfft(x, m) * gain / np.sqrt(np.mean(abs(gain) ** 2)), m)[:N]


def modes(table):
    """Causal sum of resonances, of alternating sign up the spectrum."""
    return lambda f: sum((-1) ** k * volts(db) * 1j * f * w / (c * c - f * f + 1j * f * w)
                         for k, (c, w, db) in enumerate(sorted(table)))


def colour(points):
    """Minimum-phase response through (Hz, dB) points."""
    def response(f):
        hz, db = np.transpose(points)
        cepstrum = irfft(np.log(volts(np.interp(np.log(f + 1), np.log(hz + 1), db)) + 1e-5))
        cepstrum[1:len(f) - 1] *= 2
        cepstrum[len(f):] = 0
        return np.exp(rfft(cepstrum))
    return response


def scene():
    """All sources at one microphone."""
    chalk = cracks() + kneading() + strokes() + sweeps() + pings()
    return (chalk + thuds() + room())[None]


def top_cut(x):
    """Nothing passes above the cut-off."""
    return signal.sosfilt(signal.butter(12, 16630, fs=SR, output="sos"), x)


def record(dry):
    """The loudest snaps reach the converter's ceiling."""
    mix = np.clip(dry, -1, 1)
    return top_cut(mix)


dry = scene()
out = record(dry)
log_audio(out)
```